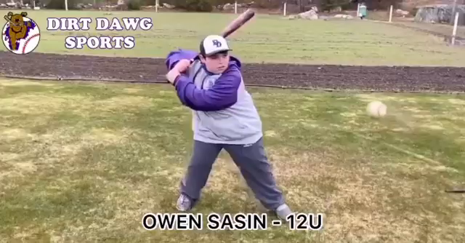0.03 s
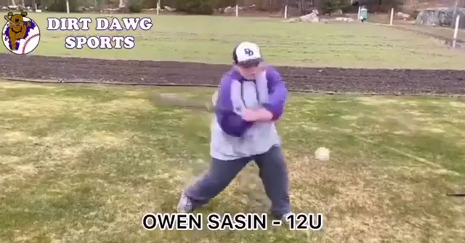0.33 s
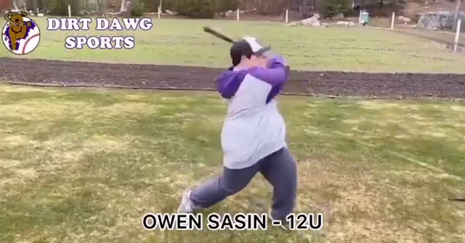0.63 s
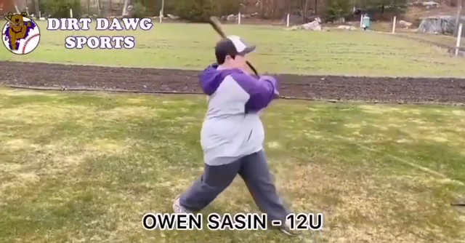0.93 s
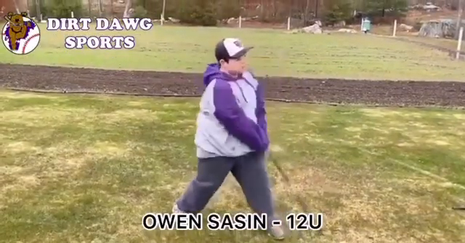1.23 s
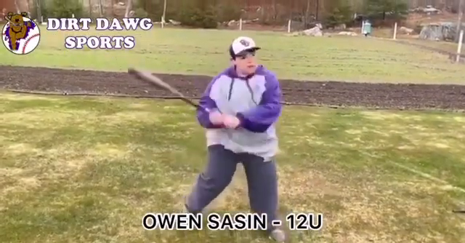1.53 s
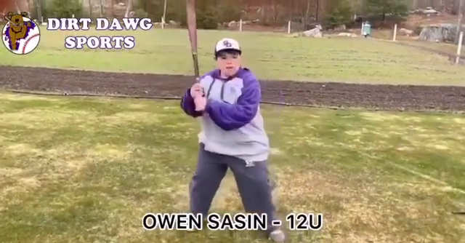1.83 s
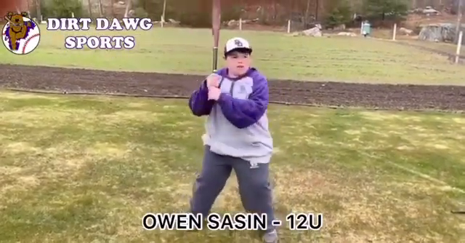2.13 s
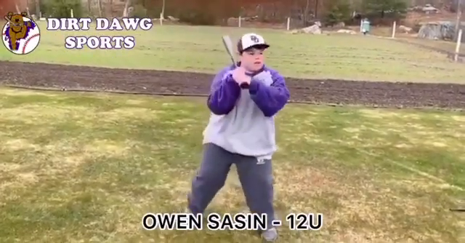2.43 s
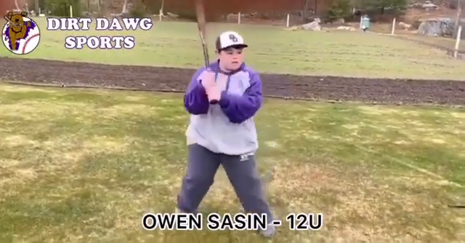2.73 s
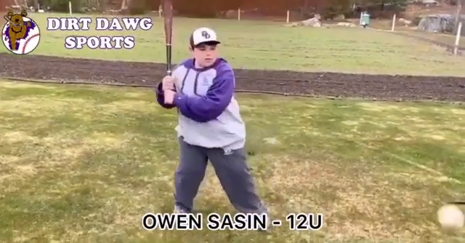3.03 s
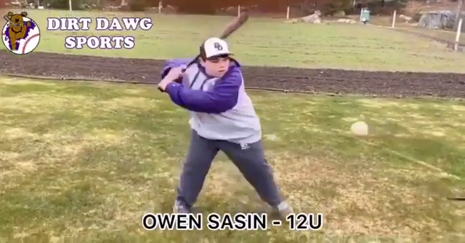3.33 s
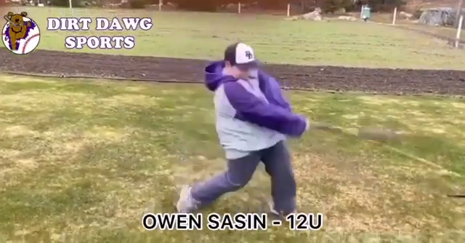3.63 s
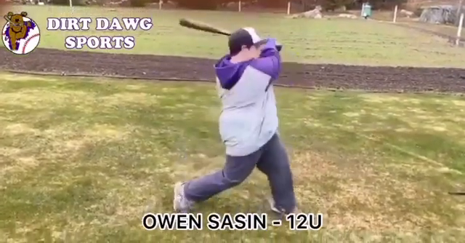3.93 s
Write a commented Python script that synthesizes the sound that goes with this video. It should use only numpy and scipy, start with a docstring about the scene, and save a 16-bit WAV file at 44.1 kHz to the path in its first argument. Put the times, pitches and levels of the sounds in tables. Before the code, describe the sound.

A bat cracks sharply against a ball at about 0.1 seconds, and the ball crashes briefly into something, probably a net, at 0.3. A hollow thud follows at 1 second. The yard then stays quiet, with a distant wash and faint clothing rustle. A second loud crack comes at 3.2 seconds, followed at once by crackle, snaps and dull knocks, while light wind rumbles on the microphone.

```python
"""Two sharp cracks of a bat on a ball ring out in an open yard, loud enough to overload the microphone.
Each impact excites the damped modes of bat and ball. A moment later the ball crashes into something
that gives, probably a net, with dry crackle, snaps and dull knocks; a hollow thud follows the first drive.
Friction of clothes and grass, wind on the microphone, a faint bird and a far-off wash fill the gaps."""
import sys
import numpy as np
from scipy import signal
from scipy.fft import rfft, irfft
from scipy.io import wavfile
from scipy.ndimage import uniform_filter1d

SR = 44100
rng = np.random.default_rng(int(sys.argv[2]) if len(sys.argv) > 2 else 0)


def transcribe(u):
    """Save the signal u as a 16-bit wav file named by the first command-line argument.

    u: samples, shape (n,) or (channels, n), limited to [-1, 1]; the rate is SR.
    q: integer samples, one column per channel.
    """
    v = np.clip(np.atleast_2d(u).T, -1, 1)
    q = np.round(v * 32767).astype(np.int16)
    wavfile.write(sys.argv[1], SR, q)


N = 176400
T = np.arange(N) / SR


def amp(db):
    """Amplitude grows tenfold for every 20 dB."""
    return 10 ** (np.asarray(db) / 20)


def unit(x):
    """Normalisation to an rms of 1."""
    return x / np.sqrt(np.mean(x ** 2) + 1e-20)


def read(points, hz):
    """Interpolation on a logarithmic frequency axis."""
    f, value = np.transpose(points)
    return np.interp(np.log(hz + 1), np.log(f + 1), value)


def level(points):
    """An amplitude envelope interpolated in decibels."""
    return amp(np.interp(T, *np.transpose(points)))


def add(mix, start_s, sound):
    """Superposition: a sound adds to the mix from start_s on."""
    part = mix[:, round(start_s * SR):][:, :sound.shape[-1]]
    part += sound[..., :part.shape[1]]


def noise(spectrum, correlation):
    """Coloured stereo noise; the balance of mid and side sets the left-right correlation."""
    a, b = rng.standard_normal((2, N))
    mid, side = np.sqrt(1 + correlation) * a, np.sqrt(1 - correlation) * b
    colour = amp(read(spectrum, np.fft.rfftfreq(N, 1 / SR)))
    return unit(irfft(rfft([mid + side, mid - side]) * colour, N))


def flutter(depth_db, span_s):
    """Log-normal amplitude modulation, smoothed over span_s."""
    size = max(1, round(span_s * SR))
    drift = uniform_filter1d(uniform_filter1d(rng.standard_normal(N), size), size)
    return unit(amp(depth_db * unit(drift)))


def burst(start_s, rise_s, decay_s):
    """A transient envelope: linear rise, exponential decay."""
    return np.clip((T - start_s) / rise_s, 0, 1) * np.exp(-np.maximum(T - start_s - rise_s, 0) / decay_s)


def swells(rows):
    """An envelope of Gaussian pulses."""
    return sum(amp(db) * np.exp(-((T - s) / half_s) ** 2) for s, db, half_s in rows)


def mode(t, hz, db, t60_s, hold_s=0):
    """A damped mode: after hold_s, a sinusoid loses 60 dB every t60_s."""
    return amp(db - 60 * np.maximum(t - hold_s, 0) / t60_s) * np.sin(2 * np.pi * hz * t)


def thump(t, hz, peak_s):
    """A heavily damped oscillation whose envelope crests at peak_s."""
    return t / peak_s * np.exp(1 - t / peak_s) * np.sin(2 * np.pi * hz * t)


def from_right(x, lag_s=0.00029):
    """Path difference: sound from the right reaches the left channel later."""
    out = np.zeros((2, N))
    add(out[:1], lag_s, x[0])
    add(out[1:], 0, x[1])
    return out


def far_wash():
    """Distant noise is diffuse: low in pitch, nearly steady and weakly correlated."""
    # loudness of the wash: time_s, level_db
    loudness = [(0.04, -51), (0.8, -53), (1.4, -51.5), (2.2, -53), (2.9, -53.5), (3.4, -51.5), (4.0, -53)]
    # its spectrum: frequency_hz, level_db
    spectrum = [(30, -17.5), (130, 3), (250, 3), (500, -2), (880, -1), (1100, -8), (1400, -16.5),
                (1950, -15), (2700, -32), (6000, -57.5), (16000, -49)]
    return level(loudness) * noise(spectrum, 0.19) * flutter(0.95, 0.066) * amp([[-0.32], [0.32]])


def wind():
    """Turbulent pressure on the microphone makes a lumpy rumble."""
    # gust strength: time_s, level_db
    gusts = [(0.13, -51), (0.15, -46), (0.72, -48.5), (0.74, -42.5), (0.95, -66), (1.0, -44), (1.09, -54),
             (1.94, -43), (1.96, -37), (2.38, -49), (2.68, -40.5), (3.07, -46), (3.26, -30), (3.28, -41),
             (3.47, -38), (3.55, -44.5), (3.68, -40), (3.8, -33), (3.99, -37)]
    # gust spectrum: frequency_hz, level_db
    gust_spectrum = [(10, -36), (25, -21), (45, -1), (62, 3), (85, 1.5), (130, -7), (200, -26.5),
                     (400, -29.5), (1500, -69.5)]
    # sharper buffets: time_s, level_db, half_length_s
    buffets = [(0.755, -47.5, 0.025), (3.958, -33, 0.011)]
    # buffet spectrum: frequency_hz, level_db
    buffet_spectrum = [(20, -12), (70, -14), (130, 2.5), (280, -13), (600, -35), (2000, -60)]
    rumble = level(gusts) * noise(gust_spectrum, 0.62) * flutter(2.5, 0.015)
    return rumble + swells(buffets) * noise(buffet_spectrum, 0.62)


def bird():
    """Random frequency modulation makes a far bird's thin, high notes waver."""
    # notes: time_s, level_db, half_length_s
    notes = [(2.14, -85, .025), (2.35, -82, .045), (2.52, -84.5, .04), (2.62, -82, 0.058), (2.78, -84, .07),
             (2.92, -82, 0.027)]
    waver = unit(uniform_filter1d(rng.standard_normal(N), round(0.002 * SR)))
    pitch_hz = 4500 + 199 * waver
    return swells(notes) * unit(np.sin(2 * np.pi * np.cumsum(pitch_hz) / SR))


def rustle():
    """Uneven friction of clothes and grass makes noise that follows the batter's movement."""
    # rustle strength: time_s, level_db
    movement = [(0.04, -62.5), (0.2, -64), (0.28, -57.5), (0.47, -64), (0.55, -58.5), (0.63, -66),
                (0.69, -62), (0.79, -63), (0.88, -69.5), (1.28, -71.5), (1.65, -71.5), (1.98, -93),
                (2.15, -73), (2.4, -81.5), (2.7, -72.5), (2.88, -78.5), (3.1, -69.5), (3.3, -60.5),
                (3.55, -62.5), (3.68, -54.5), (3.78, -63), (4.0, -61)]
    # friction spectrum: frequency_hz, level_db
    spectrum = [(300, 1), (1200, 5.5), (2800, 2), (4500, 0), (7500, -5.5), (9000, -16), (11500, 0.5),
                (16000, -15.5)]
    # quick brushes of cloth: time_s, level_db, half_length_s
    brushes = [(0.78, -67.5, 0.034), (0.991, -56.5, 0.013), (1.524, -64, 0.012), (3.04, -58, 0.011),
               (3.055, -53, 0.011)]
    cloth = level(movement) * noise(spectrum, 0.25) + from_right(swells(brushes) * noise(spectrum, 0.22))
    return cloth * flutter(0.99, 0.015) * flutter(0.8, 0.001)


def thud():
    """Free vibration: a board rings briefly in its low modes."""
    # board modes: pitch_hz, level_db, t60_s
    modes = [(161, -25, 0.12), (291, -28, 0.11), (397, -25.5, 0.13), (531, -23.5, 0.076),
             (620, -15.5, 0.015), (870, -28.5, 0.043), (993, -30, 0.048)]
    out, t = np.zeros((2, N)), T[:SR // 3]
    ring = np.minimum(t / 0.0028, 1) * sum(mode(t, hz, db, t60) for hz, db, t60 in modes)
    add(out, start_s=0.99, sound=ring * amp([[-2], [0]]))
    return out


def snaps():
    """Each snap is an impulse: a bright click and a short noise burst with one broad resonance."""
    # snaps: start_s, level_db, centre_hz, decay_s, click_db
    events = [(0.541, -56, 8300, 0.0035, -40), (0.548, -62, 7000, .001, -52), (0.562, -60, 7000, .001, -44),
              (0.6455, -55, 9150, 0.0008, -50), (1.355, -56.5, 4700, 0.0049, -43),
              (1.459, -54.5, 2370, 0.0021, -77), (3.3488, -23, 3880, 0.0017, -32),
              (3.3587, -31.5, 3900, .0016, -32), (3.4523, -25.5, 3100, 0.001, -39),
              (3.5171, -38.5, 2530, 0.0024, -40), (3.672, -50, 6000, .001, -53),
              (3.731, -48, 6000, 0.0009, -61), (3.864, -37.5, 3600, 0.0012, -60),
              (3.885, -50, 3600, 0.0024, -62)]
    # resonance shape: ratio_to_centre, level_db
    resonance = [(.1, -29), (.65, -13), (.85, 2), (1, 10), (1.35, -17.5), (1.8, -7), (2.7, -30), (5, -55)]
    # click spectrum: frequency_hz, level_db
    click_spectrum = [(300, -18), (3000, -3), (6500, 3), (9000, -20), (12000, -10), (16000, 3)]
    out, click = np.zeros((2, N)), noise(click_spectrum, 0.99)
    for start_s, db, centre_hz, decay_s, click_db in events:
        spectrum = [(centre_hz * ratio, gain_db) for ratio, gain_db in resonance]
        out += amp(db) * burst(start_s, 0.0002, decay_s) * noise(spectrum, 0.87)
        out += amp(click_db) * burst(start_s, 0.00015, 0.00042) * click
    return out


def rebounds():
    """Each impact of the rebounding ball excites the same damped modes over a low thump."""
    # dull knocks: start_s, ring_db, thump_db
    knocks = [(0.3296, -7, -37.5), (3.3628, -9, -55), (3.3928, 2, -46), (3.3984, -1, -41),
              (3.4532, -5.5, -59)]
    # their modes: pitch_hz, level_db, t60_s
    modes = [(438, -29, 0.044), (750, -42, 0.018), (934, -32, 0.027), (1160, -45, 0.041), (1640, -50, .022),
             (1850, -46, 0.027)]
    out, t = np.zeros((2, N)), T[:SR // 8]
    ring = sum((-1) ** m * mode(t, hz, db, t60) for m, (hz, db, t60) in enumerate(modes))
    ring *= np.minimum(t / 0.00064, 1)
    for start_s, ring_db, thump_db in knocks:
        add(out, start_s, amp(db=ring_db) * ring + amp(thump_db) * thump(t, hz=208, peak_s=0.0075))
    return out


def crashes():
    """Inelastic collision: something that gives stops the ball, with dry crackle over a duller body."""
    # collisions: start_s, crackle_db, body_db, rise_s, decay_s
    collisions = [(0.3289, -31.5, -38, 0.00081, 0.011), (0.337, -33.5, -45, 0.00077, 0.0054),
                  (0.349, -56.5, -42.5, 0.031, 0.036), (3.3586, -30, -34.5, 0.0011, 0.005),
                  (3.364, -47.5, -46.5, 0.0094, 0.098), (3.392, -50, -32.5, 0.0061, 0.006),
                  (3.454, -58, -39, 0.002, 0.0017)]
    # crackle spectrum: frequency_hz, level_db
    crackle_spectrum = [(300, 2), (1000, -9), (2200, -3), (2900, 8), (4200, -2.5), (5600, 4), (7500, -13),
                        (12000, -11), (16000, -17)]
    # body spectrum: frequency_hz, level_db
    body_spectrum = [(40, -13), (200, 12), (450, -3), (900, 6.5), (1800, 8), (3000, -3), (12000, -20)]
    crackle, body = noise(crackle_spectrum, 0.21), noise(body_spectrum, 0.8)
    return sum(burst(start_s, rise_s, decay_s) * (amp(crackle_db) * crackle + amp(body_db) * body)
               for start_s, crackle_db, body_db, rise_s, decay_s in collisions)


def bat():
    """Brief contact excites a broad band; where the ball meets the barrel sets each mode's strength."""
    # blows: start_s, level_db, tick_db, crack_db
    blows = [(0.0975, -1, -10.5, -15), (3.2405, -5.5, -9, -11)]
    # modes of bat and ball: pitch_hz, t60_s, first_blow_db, second_blow_db
    modes = [(477, 0.0081, -10, -7.5), (650, 0.013, -30, -3.5), (808, 0.014, -11, -17.5),
             (1025, 0.016, -6.5, -8.5), (1275, 0.018, -22.5, -9.5), (1423, 0.024, -16.5, -23),
             (1565, .018, -18, -17.5), (1883, 0.013, -12, -6.5), (2074, 0.015, -20, -40),
             (2456, 0.014, -22.5, -11.5), (3330, .018, -33.5, -37.5), (3732, .011, -33, -19),
             (4166, .011, -31.5, -16.5), (5490, .012, -33, -39)]
    # hard contact tick: frequency_hz, level_db
    tick_spectrum = [(100, -22.5), (2000, -14), (4000, -9), (5800, 0.5), (7200, -6), (9000, -6), (11500, 1),
                     (13500, -2.5), (15300, -1), (17000, -12)]
    # crack of the wood: frequency_hz, level_db
    crack_spectrum = [(200, -10), (1000, -1), (2400, 0), (2900, -5.5), (4000, 0.5), (4900, 0), (5600, -5),
                      (7000, -16.5), (14000, -30.5)]
    out, t = np.zeros((2, N)), T[:SR // 6]
    tick, crack = noise(tick_spectrum, 0.67), noise(crack_spectrum, 0.99)
    air_push = amp(-28) * thump(t, hz=80.9, peak_s=0.0083)
    ball_knock = amp(-24.5) * thump(t, hz=211.3, peak_s=0.0042)
    for blow, (start_s, db, tick_db, crack_db) in enumerate(blows):
        ring = sum((-1) ** m * mode(t, hz, mode_db[blow], t60, hold_s=0.0026)
                   for m, (hz, t60, *mode_db) in enumerate(modes))
        ring *= np.minimum(t / 0.0011, 1)
        add(out, start_s, amp(db) * (ring * amp([[-0.6], [0.6]]) + air_push + ball_knock))
        spike = burst(start_s - 0.0001, 0.00068, 0.00025)
        sizzle = amp(-14.5) * burst(start_s, 0.0008, 0.0042)
        contact = amp(tick_db) * tick * (spike + sizzle)
        out += from_right(contact, lag_s=0.00027) * amp([[-0.5], [0]])
        out += amp(crack_db) * crack * burst(start_s, 0.0005, 0.0009)
    return out


def yard(x):
    """Convolution with the yard's response adds ground scatter, one smeared echo and a faint tail."""
    # reverberation time: frequency_hz, t60_s
    decay = [(100, 0.35), (800, 0.3), (3000, 0.27), (14000, 0.28)]
    hz, t, bands = signal.stft(rng.standard_normal((2, SR)), SR, nperseg=256)
    tail = signal.istft(bands * amp(-60 * t / read(decay, hz)[:, None]), SR, nperseg=256)[1]
    scatter = noise([(100, 0.8), (1000, -2), (4000, -1), (14000, -8)], 0.2)
    scatter *= burst(start_s=0.0026, rise_s=0.002, decay_s=0.0046)
    echo = noise([(100, -5.5), (700, -4), (2400, 0.5), (5000, 1), (14000, -18)], 0.43)
    echo *= burst(start_s=0.045, rise_s=0.0012, decay_s=0.0066)
    paths = [(-28.5, tail), (-19, scatter), (-36.5, echo)]
    response = sum(amp(db) * unit(path[:, :SR]) for db, path in paths) / np.sqrt(SR)
    return x + signal.fftconvolve(x, response, axes=1)[:, :N]


def scene():
    """The sources superpose: the bat ahead and the ball landing to the right, over the background."""
    impacts = bat() + from_right(crashes() + rebounds() + snaps() + thud())
    return yard(impacts) + rustle() + wind() + far_wash() + bird()


def record(dry):
    """After a moment of silence, saturation rounds off the peaks and a low-pass limits the band."""
    fade_in = np.clip((T - 0.035) / 0.0043, 0, 1)
    low_pass = signal.firwin(255, 16500, window=("kaiser", 9), fs=SR)
    return signal.oaconvolve(np.tanh(dry) * fade_in, low_pass[None], "same")


dry = scene()
out = record(dry)
transcribe(out)
```